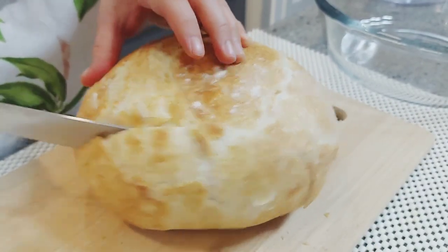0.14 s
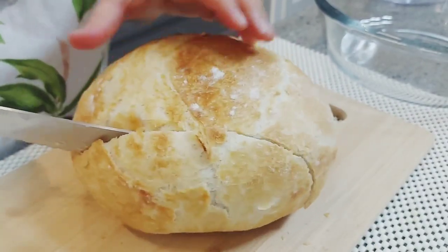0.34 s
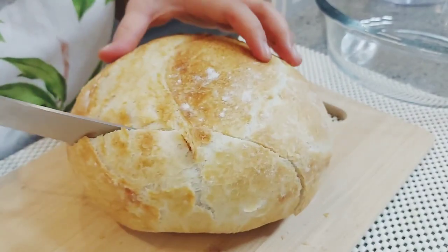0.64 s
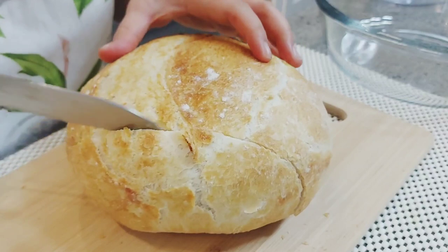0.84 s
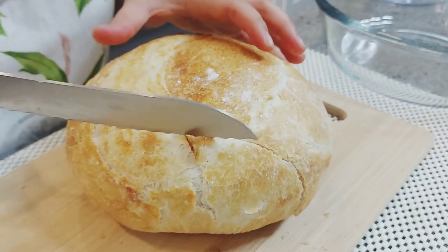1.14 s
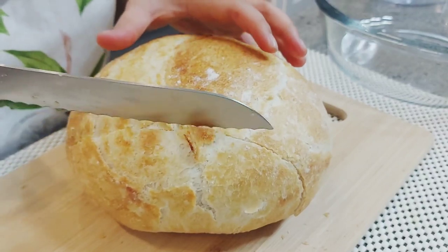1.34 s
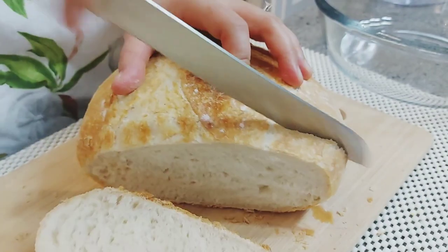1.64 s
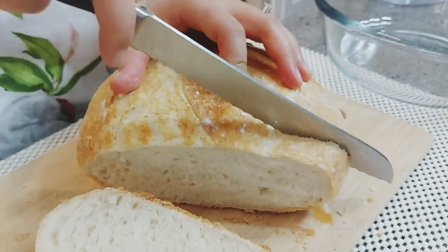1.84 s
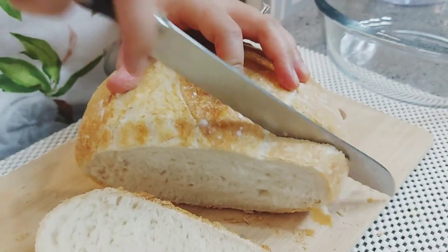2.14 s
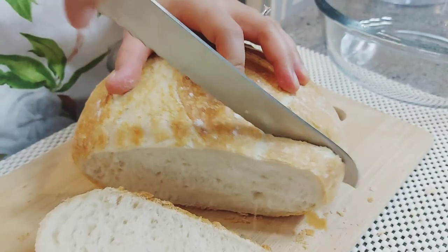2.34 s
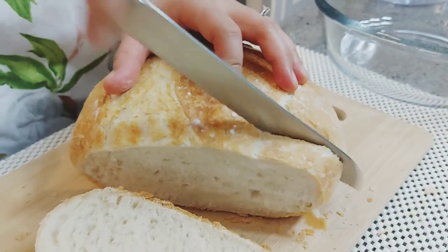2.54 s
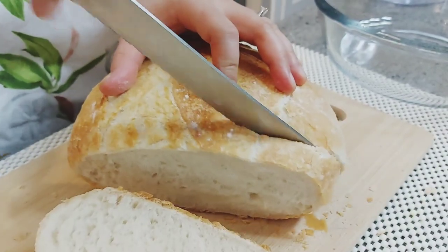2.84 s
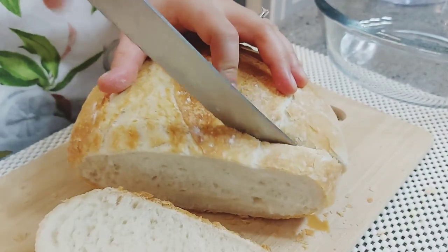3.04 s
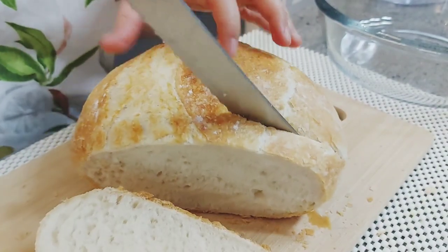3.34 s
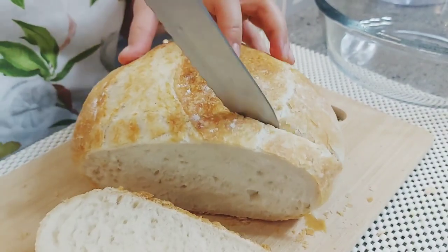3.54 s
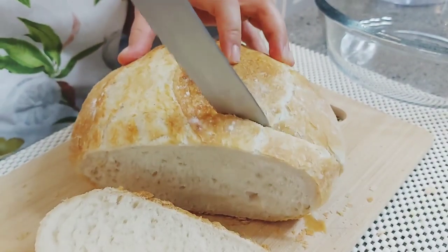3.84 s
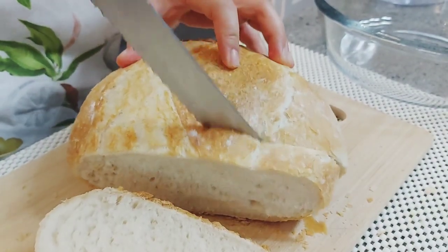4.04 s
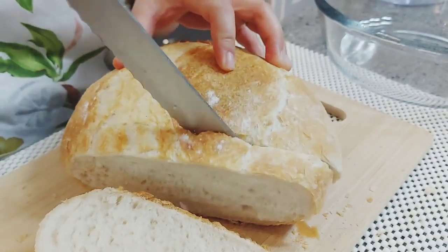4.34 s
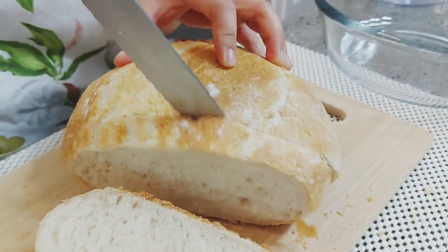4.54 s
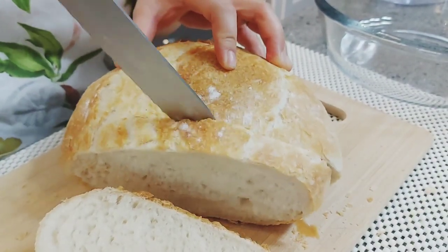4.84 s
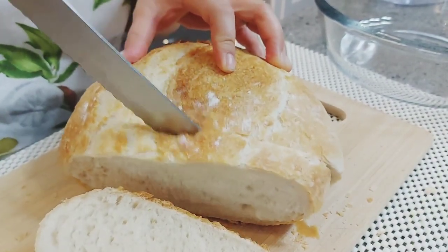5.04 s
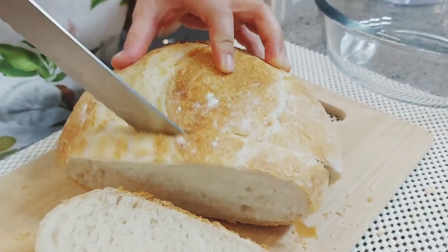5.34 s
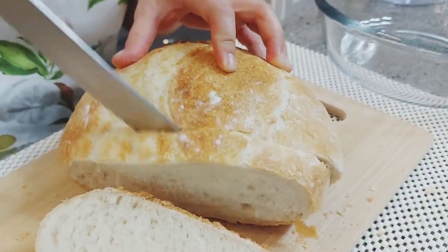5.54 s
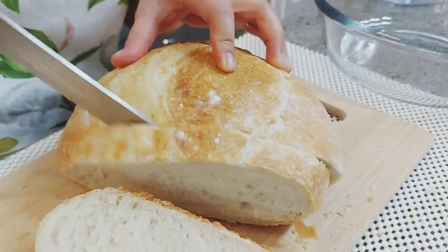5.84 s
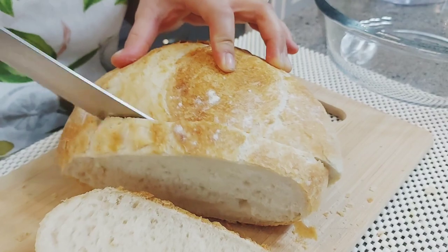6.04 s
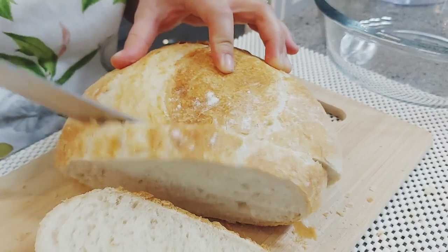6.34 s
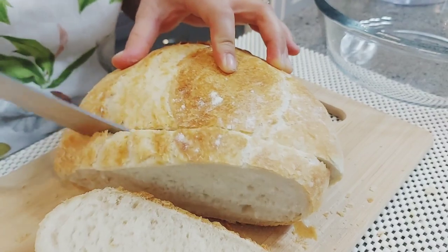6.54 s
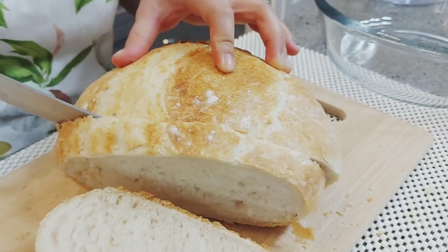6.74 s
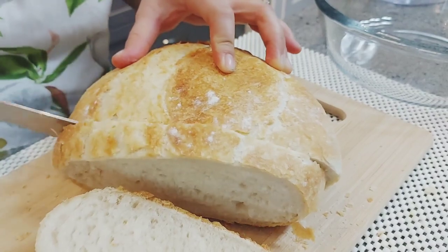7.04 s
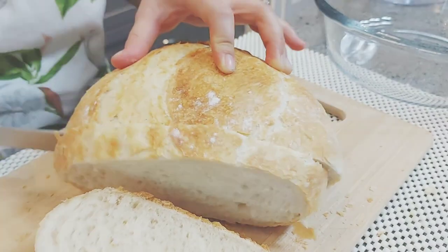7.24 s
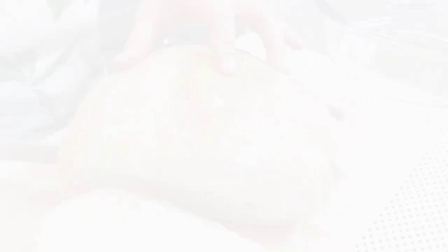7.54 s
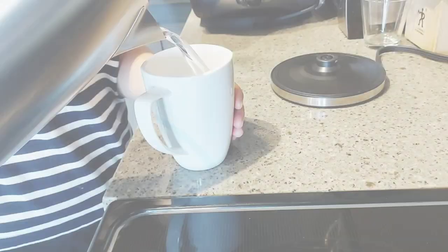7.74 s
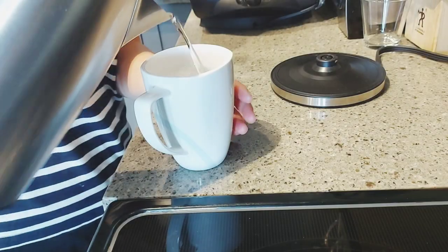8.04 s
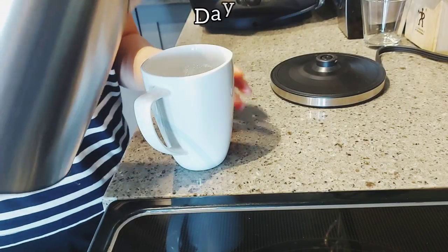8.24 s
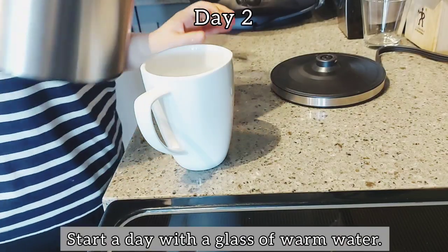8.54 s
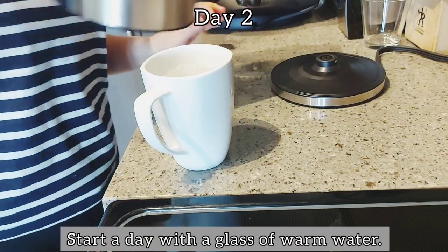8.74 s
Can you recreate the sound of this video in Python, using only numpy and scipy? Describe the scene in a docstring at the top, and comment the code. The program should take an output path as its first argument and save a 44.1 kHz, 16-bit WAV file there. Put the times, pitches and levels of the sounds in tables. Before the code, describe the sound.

Close stereo phone pickup in a small kitchen. A few light scrapes and ticks of a blade on crust, a near-quiet gap, then brisk sawing at about three strokes a second, crunchy and crackling, with one wooden tip knock. Strokes gradually soften and drift left, then fade quickly into a faintly humming kitchen with a few watery blips in a mug.

```python
"""A small kitchen, close up: a serrated knife saws a crusty loaf on a wooden board, heard in stereo by a phone.
Each stroke is noise shaped by a random stream of breaking crust cells, with short bursts for cracks, ticks
and soft taps of the blade; filters for loaf, crust, teeth and blade colour it, and reflections place it.
The sawing fades out quickly and a second, humming kitchen fades in, where the last splashes from a kettle
fall into a mug: gliding sine bubbles with noise spray, over a soft hiss."""
import sys
import numpy as np
from scipy import signal
from scipy.fft import rfft, irfft
from scipy.io import wavfile
from scipy.ndimage import uniform_filter1d

SR = 44100
rng = np.random.default_rng(int(sys.argv[2]) if len(sys.argv) > 2 else 0)


def unload_wav(signal):
    """Save mono or channel-first audio to the path in sys.argv[1] as 16-bit WAV at rate SR, clipped to [-1, 1]."""
    wavfile.write(
        sys.argv[1],
        SR,
        np.round(np.clip(np.atleast_2d(signal).T, -1, 1) * 32767).astype(np.int16),
    )


N = 391608
TIME = np.arange(N) / SR

# where the cut lies, and its brightness: (time [s], lead of the left microphone [samples],
# left minus right before weighting by layer [dB], blade sheen gain [dB], tooth rasp gain [dB])
CUT_PLACE = [(.6, 9.2, 6, -6, 1.5), (1.1, 7, 3.5, 3.5, -1.5), (1.5, 0.97, -0.5, -4.5, -3.5),
             (3.1, 3.91, 1, 0, 0.1), (4.7, 6.8, 2, 0.5, -2), (5.6, 8.86, 5, 3, -0.5),
             (7.2, 11.5, 6, 0, 0.2)]
# how deep the teeth dig in: (time [s], depth [0 = sliding over the crust, 1 = tearing through it])
CUT_DEPTH = [(.05, 0.52), (.2, 0.015), (.3, 0.48), (.6, 0.062), (.95, 1), (1.15, 0.61), (1.8, 0.61),
             (2.2, .5), (3.1, 0.72), (3.7, 0.62), (4.45, 0.79), (5.25, 0.65), (5.75, 0.67), (5.95, 0.84),
             (6.3, 0.75), (6.6, .48), (7.15, 0.31), (7.5, 0.42)]
# colour of water hiss and spray: (frequency [Hz], level [dB])
WATER_COLOUR = [(1000, -12), (2000, -17), (3200, -6.5), (5500, -7.5), (7000, 5.5), (9000, -11), (12000, 2),
                (16000, -5)]

# crossovers between loaf, crust, teeth and blade
LOAF_TOP_HZ, CRUST_TOP_HZ, TEETH_TOP_HZ = 500, 4000, 9500


def undb(db):
    """Decibels to gain."""
    return 10 ** (np.asarray(db) / 20)


def curve(rows, axis=1):
    """One column of a table, joined by straight lines in time."""
    rows = np.array(rows)
    return np.interp(TIME, rows[:, 0], rows[:, axis])


def unit(x):
    """Scale to an energy of one per channel."""
    energy = np.sum(x ** 2, axis=-1, keepdims=True)
    return x / np.sqrt(energy + 1e-20)


def add(out, s, x):
    """Mix a short sound in at time s."""
    i = int(s * SR)
    out[i:i + len(x)] += x[:N - i]


def convolve(x, impulse):
    """Pass a sound through an impulse response."""
    return signal.oaconvolve(x, impulse)[:len(x)]


def colour(points, hz):
    """Gain of a spectrum at the given frequencies, joined along log frequency."""
    f, db = np.transpose(points)
    return undb(np.interp(np.log(hz + 1), np.log(f), db))


def response(points, lo, hi, size=4096):
    """Minimum-phase impulse response of a spectrum between two soft edges: its energy comes at once."""
    hz = np.arange(size // 2 + 1) * SR / size + 1
    edges = np.sqrt((1 + (lo / hz) ** 10) * (1 + (hz / hi) ** 10))
    gain = colour(points, hz) / edges
    # folding the cepstrum forward in time makes the response causal
    cepstrum = irfft(np.log(gain + 1e-5))
    cepstrum[1:size // 2] *= 2
    cepstrum[size // 2 + 1:] = 0
    return unit(irfft(np.exp(rfft(cepstrum))))


def tail(t60, delay, share, size=22050):
    """Reflections that start after a delay and die away; a small share leaves them few and distinct."""
    t = TIME[:size]
    echoes = rng.standard_normal(size) * (rng.random(size) < share)
    return unit(echoes * undb(-60 * t / t60) * (t > delay))


def noise(points, db):
    """Steady noise with a given spectrum and RMS level."""
    hz = np.arange(N // 2 + 1) * SR / N
    x = irfft(rfft(rng.standard_normal(N)) * colour(points, hz), N)
    return unit(x) * np.sqrt(N) * undb(db)


def kitchen(x, pan_db, near_db, room_db, near_t60=.026, room_t60=0.34, count=4):
    """Two microphones hear the direct sound, single echoes off board and counter, and the room."""
    n, lead = np.arange(N), curve(CUT_PLACE) / 2
    # short stretches of sound take turns at random spots, each with its own nearby reflections
    spot = np.repeat(rng.integers(count, size=N // 256 + 1), 256)[:N]
    parts = [x * uniform_filter1d((spot == k) * 1., size=64) for k in range(count)]
    channels = []
    for side in (1, -1):  # left, right
        heard_at = n + np.round(side * lead).astype(int)
        direct = x[np.clip(heard_at, 0, N - 1)]
        near = sum(convolve(part, tail(near_t60, .0001, .1, size=2048)) for part in parts)
        room = convolve(x, tail(room_t60, 0.0095, 1))
        mix = direct + undb(near_db) * near + undb(room_db) * room
        channels.append(mix * undb(side * pan_db / 2))
    return np.array(channels) / np.sqrt(1 + undb(2 * near_db) + undb(2 * room_db))


def board_air():
    """Quiet room air and a slightly wavering low hum, riding one level curve."""
    # room air: (frequency [Hz], level [dB])
    air_colour = [(30, -16.5), (70, -7.5), (230, -1.5), (700, -14.5), (3000, -38), (6500, -26.5),
                  (16000, -32)]
    # gain of hum and air together: (time [s], level [dB])
    air_level = [(0, -57.5), (1.35, -86), (1.45, -55.5), (6.3, -54), (7.5, -67.5)]
    waver = np.interp(TIME, TIME[::4000], rng.standard_normal(len(TIME[::4000])))
    hum = np.sqrt(2) * np.sin(2 * np.pi * np.cumsum(220.7 + 1.5 * waver) / SR)
    shared_air = noise(air_colour, -5)
    wide_air = np.array([noise(air_colour, -8) for _ in range(2)])
    return (hum + shared_air + wide_air) * undb(curve(air_level))


def dig(s):
    """How much deeper than usual the blade sits at time s."""
    usual_depth = 0.59
    return np.interp(s, *np.transpose(CUT_DEPTH)) - usual_depth


def strokes():
    """Lone scrapes, and saw cycles of a push and a usually weaker pull: (start s, length s, dB, 1 if pulled)."""
    # the blade grazes the crust while lifted or lined up: (start [s], length [s], base level [dB])
    scrapes = [(0.017, 0.11, -39), (0.168, 0.079, -41.5), (0.255, 0.081, -42), (.384, 0.06, -64.5),
               (0.51, 0.14, -58.5), (0.646, 0.23, -66.5), (0.926, .1, -60), (1.135, 0.066, -50.5),
               (1.183, 0.077, -61), (1.337, 0.045, -64), (1.404, 0.041, -47), (3.434, 0.16, -54.5),
               (7.411, .1, -56)]
    # saw cycles: (start [s], length of the push [s], base push level [dB], base pull level [dB])
    saw_cycles = [(1.463, 0.11, -29.5, -30.5), (1.791, .106, -32, -33.5), (2.086, .118, -30, -37.5),
                  (2.416, 0.084, -31, -32.5), (2.72, 0.1, -36.5, -41), (3.03, 0.078, -35.5, -66),
                  (3.648, 0.1, -36, -37.5), (3.977, .098, -33.5, -40.5), (4.309, 0.072, -33, -39.5),
                  (4.629, 0.088, -33.5, -39), (4.944, 0.11, -38.5, -40.5), (5.266, 0.099, -36.5, -41),
                  (5.588, 0.15, -36, -41.5), (5.905, 0.1, -37, -38.5), (6.222, 0.11, -32.5, -45.5),
                  (6.544, 0.11, -39.5, -47), (6.854, 0.12, -38.5, -44.5), (7.14, .098, -42.5, -56)]
    # a firm pull runs its full length, a light one stops sooner: (pull level [dB], share of full length)
    pull_reach = [(-44, .75), (-40, 1)]
    # the hand turns round partway to the next push; both are shares of one cycle
    pull_starts, pull_lasts, slowest_cycle_s = .49, .345, .33
    moves = [(start, length, db, 0) for start, length, db in scrapes]
    gaps = np.diff([row[0] for row in saw_cycles])
    cycles = np.minimum(np.append(gaps, gaps[-1]), slowest_cycle_s)
    for (start, length, push_db, pull_db), cycle in zip(saw_cycles, cycles):
        reach = np.interp(pull_db, *np.transpose(pull_reach))
        moves.append((start, length, push_db, 0))
        moves.append((start + pull_starts * cycle, reach * pull_lasts * cycle, pull_db, 1))
    return moves


def pressure(gain_db, deep_db, pull_db, rise_s, fall_s, arch_db):
    """Each stroke sets in fast, peaks midway and dies as the knife turns; depth and direction shift it."""
    power, pull_shift = np.zeros(N), np.broadcast_to(pull_db, N)
    for start, length, db, pulled in strokes():
        span = slice(max(0, int((start - .05) * SR)), int((start + length + .2) * SR))
        t = TIME[span] - start
        arch = arch_db * (np.sin(np.pi * np.clip(t / length, 0, 1)) - 1)
        edges = np.exp(np.minimum(t, 0) / rise_s - np.maximum(t - length, 0) / fall_s)
        level = db + gain_db + deep_db * dig(start + length / 2) + pulled * pull_shift[span]
        power[span] += (undb(level + arch) * edges) ** 2
    return np.sqrt(power)


def fractures(burst_s, tooth_hz, bite_db, slide_rub):
    """Cells break at random, mostly small, loudest as each tooth bites; a sliding blade mostly rubs."""
    per_s, spread_db, deep_rub = 650, 5.5, .06
    breaks = rng.random(N) < per_s / SR
    sizes = undb(spread_db * np.minimum(rng.exponential(size=N), 4)) * breaks
    power = convolve(sizes ** 2, np.exp(-TIME[:1000] / burst_s))
    speed = np.interp(TIME, TIME[::1000], np.exp(0.25 * rng.standard_normal(len(TIME[::1000]))))
    tooth = np.cumsum(tooth_hz * speed / SR) % 1  # 0 at the bite, towards 1 before the next
    depth = np.clip(curve(CUT_DEPTH), 0, 1)
    rub = deep_rub + slide_rub * (1 - depth) ** 3
    return np.sqrt(np.abs(power) / power.mean() + rub) * undb(-bite_db * depth * tooth)


def sawing(grain, body, even_s):
    """The stream of fractures rings a body; its strength stays even over a few teeth."""
    x = convolve(grain * rng.standard_normal(N), body)
    return x / np.sqrt(uniform_filter1d(x ** 2, int(even_s * SR)) + 1e-9)


def hollow(x, turn_hz, tilt_db):
    """The deeper the cut, the more the crumb muffles the crackle and the lower the crust sounds."""
    low = signal.sosfiltfilt(signal.butter(2, turn_hz, fs=SR, output="sos"), x)
    gain = undb(tilt_db * (curve(CUT_DEPTH) - 0.6576))
    return low * gain + (x - low) / gain


def cracks_and_ticks(count=2):
    """Placed contacts, and random ones whose level follows their stroke: (s, crack dB, tick dB)."""
    # cracks, ticks and soft taps of the blade on the crust:
    # (time [s], base crust crack level [dB], base tooth tick level [dB])
    contacts = [(.0363, -39.5, -26.5), (.0692, -30.5, -28), (.989, -46.5, -56), (1.01, -48, -50),
                (1.129, -41.5, -39.5), (1.346, -53.5, -37), (1.4869, -20, -28.5), (1.5062, -17.5, -31),
                (1.5401, -18, -16.5), (1.5634, -21, -17), (1.8108, -13.5, -17.5), (1.8467, -15, -16),
                (1.8751, -14.5, -26), (2.1117, -19, -35.5), (2.1525, -21, -21.5), (2.1918, -27, -18.5),
                (2.2921, -31, -20.5), (2.4104, -28.5, -24), (2.4751, -15, -20.5), (2.746, -31, -19.5),
                (2.7642, -25, -16), (3.0353, -32.5, -27), (3.0814, -19, -25), (3.65, -35, -33),
                (3.6782, -25, -25), (4.1127, -32, -34.5), (4.6455, -29, -26.5), (4.669, -27.5, -22.5),
                (4.6973, -17.5, -19), (5.0079, -27, -28), (5.1249, -55, -32), (5.3326, -15, -38),
                (5.343, -24, -27), (5.445, -33, -25.5), (5.618, -32, -28), (5.6846, -33.5, -22.5),
                (5.9161, -37, -33.5), (5.9936, -24, -20), (6.0361, -44, -27), (6.1314, -27, -35),
                (6.2031, -35.5, -25.5), (6.2152, -39, -27.5), (6.2709, -40, -42.5), (6.7227, -43, -33),
                (6.844, -37, -33), (7.186, -43, -30.5)]
    over_stroke_db, scatter_db = 3.5, 3.5
    rows = list(contacts)
    for start, length, db, _ in strokes():
        for place in rng.triangular(0, .5, 1, count):
            crack, tick = db + over_stroke_db + scatter_db * rng.standard_normal(2)
            rows.append((start + place * length, crack, tick))
    return rows


def snapping(body, times, levels_db, crack_s, splinter):
    """Each contact rings a body with one short impulse, then a few milliseconds of splintering noise."""
    level_window_s = .005  # levels are RMS over this time
    out, t = np.zeros(N), TIME[:len(body)]
    shape = np.exp(-t / crack_s) + splinter * np.exp(-t / .0035)
    crack = np.roll(body, int(crack_s * SR / 2))
    for s, db in zip(times, levels_db):
        splinters = unit(convolve(shape * rng.standard_normal(len(t)), body))
        snap = unit(np.sqrt(2) * crack + splinters)
        add(out, s, snap * undb(db) * np.sqrt(level_window_s * SR))
    return out


def knocks():
    """The tip comes through the loaf and rings the wooden board as decaying sine modes."""
    # blade tip on the board: (time [s], level [dB])
    tip_hits = [(2.4745, -18.5), (2.483, -24.5)]
    # modes of the board: (frequency [Hz], relative level [dB], t60 [s])
    board_modes = [(690, -1.5, 0.042), (770, 8, 0.043), (828, 0, .05), (1340, -13, .04)]
    out, t = np.zeros(N), TIME[:4096]
    ring = sum(undb(db - 60 * t / t60) * np.sin(2 * np.pi * hz * t) for hz, db, t60 in board_modes)
    for s, db in tip_hits:
        add(out, s, undb(db) * ring)
    return out


def bread():
    """The same fractures thump the loaf, crackle in the crust, tick on the teeth and glint in the steel."""
    # colour of loaf and board: (frequency [Hz], level [dB])
    loaf_colour = [(25, -42), (50, -10), (88, -9.5), (122, 2), (160, -4.5), (220, -0.5), (260, -5),
                   (305, 2), (400, -3.5), (600, -7)]
    # colour of the crust: (frequency [Hz], level [dB])
    crust_colour = [(400, -9.5), (600, -4), (760, -2.5), (1000, -4), (1400, -6.5), (2000, -9), (2600, -8.5),
                    (3400, -13.5), (5000, -12)]
    # colour of the teeth: (frequency [Hz], level [dB])
    teeth_colour = [(3500, -5.5), (5200, -5.5), (7100, -3), (8200, -7.5), (9100, -15.5), (11000, -4)]
    # the steel blade's bright top: (frequency [Hz], level [dB])
    blade_colour = [(9000, -9.5), (10500, -1.5), (10950, -5), (11500, 2), (12100, -7.5), (13400, 6),
                    (14100, -5), (14500, -4.5), (15050, 1.5), (15650, -3), (16300, -19.5)]
    # the teeth catch in the crumb and thump the loaf: (time [s], level [dB])
    catches = [(2.6512, -26), (3.7062, -21.5), (4.004, -30), (4.6457, -21), (4.664, -18.5), (5.7621, -31),
               (5.9158, -29), (7.227, -39)]
    # shift of the treble in the pulls: (time [s], level [dB])
    pull_treble = [(2, -5), (2.3, 1.5), (2.6, -6), (2.95, 0), (4.5, -4.5), (4.85, -1.5), (6.4, -1),
                   (7.05, -13)]

    times, crack_db, tick_db = np.transpose(cracks_and_ticks())
    # each contact also jolts the loaf: 5.5 dB under the mean of its crack and tick, more in a deep cut
    jolt_db = (crack_db + tick_db) / 2 - 5.5 + 20.5 * dig(times)
    # bite_db: how far the crackle sinks between one tooth's bite and the next at full depth
    grain = fractures(burst_s=0.00025, tooth_hz=55.4, bite_db=5, slide_rub=6.4)
    loaf = response(loaf_colour, 38, LOAF_TOP_HZ)
    crust = response(crust_colour, LOAF_TOP_HZ, CRUST_TOP_HZ)
    teeth = response(teeth_colour, CRUST_TOP_HZ, TEETH_TOP_HZ)
    blade = response(blade_colour, TEETH_TOP_HZ, SR)

    weight = pressure(gain_db=4.5, deep_db=11.5, pull_db=-0.5, rise_s=0.007, fall_s=0.044, arch_db=11.0)
    thump = sawing(grain, loaf, 0.076) * weight
    thump += snapping(loaf, times, jolt_db, crack_s=0.00091, splinter=0.19)
    thump += snapping(loaf, *np.transpose(catches), crack_s=.001, splinter=.3)

    crush = pressure(gain_db=4.5, deep_db=-6.5, pull_db=-2.35, rise_s=0.0074, fall_s=0.011, arch_db=9)
    crunch = sawing(grain, crust, 0.03) * crush
    crunch = hollow(crunch, turn_hz=1140, tilt_db=10.5) + knocks()
    crunch += snapping(crust, times, crack_db, crack_s=.0005, splinter=.25)

    bite = pressure(gain_db=3.0, deep_db=-6.5, pull_db=curve(pull_treble),
                    rise_s=0.0031, fall_s=0.0056, arch_db=8.0)
    # teeth and blade share each tick
    rasp = sawing(grain, teeth, 0.045) * bite
    rasp += snapping(teeth, times, tick_db, crack_s=.0003, splinter=.2) / np.sqrt(2)
    sheen = sawing(grain, blade, 0.074) * bite
    sheen += snapping(blade, times, tick_db, crack_s=.0003, splinter=.25) / np.sqrt(2)
    sheen *= undb(curve(CUT_PLACE, axis=3))
    rasp *= undb(curve(CUT_PLACE, axis=4))

    pan_db = curve(CUT_PLACE, axis=2)  # the phone's body shades mostly the short waves
    return (kitchen(thump, -.4, near_db=-14.5, room_db=-14)
            + kitchen(crunch, 0.19 * pan_db, near_db=-0.5, room_db=-7)
            + kitchen(rasp, .3 * pan_db, near_db=0, room_db=-10, near_t60=.014)
            + kitchen(sheen, 1.6 * pan_db, near_db=0, room_db=-13, near_t60=.018))


def kettle_air():
    """Noise for air, steady sines for appliance hum, and the soft hiss of pouring in the second kitchen."""
    # room air by the kettle: (frequency [Hz], level [dB])
    air_colour = [(25, -31.5), (55, -4.5), (100, -13), (180, -8.5), (220, -20.5), (300, -11.5), (410, -10),
                  (600, -22), (780, -23), (1050, -32.5), (1600, -40), (3000, -45), (16000, -41.5)]
    # appliance hum: (frequency [Hz], level [dB])
    hum_tones = [(59.2, -61.5), (96.9, -66), (414.5, -71)]
    # fade-in of hum and air: (time [s], level [dB])
    fade_in = [(7.6, -29), (7.7, -15.5), (8.1, -0.5), (8.4, -0.5), (8.65, 1)]
    # hiss of the trickle and of the kettle being lifted away: (time [s], level [dB])
    trickle = [(7.7, -90), (8, -78), (8.2, -65.5), (8.34, -65.5), (8.48, -84), (8.56, -62), (8.88, -80.5)]
    hum = 0
    for hz, db in hum_tones:
        tone = np.sin(2 * np.pi * (hz * TIME + rng.random()))
        hum = hum + np.sqrt(2) * undb(db - 0.5) * tone
    shared_air = noise(air_colour, -62.5)
    wide_air = np.array([noise(air_colour, -60) for _ in range(2)])
    hiss = np.array([noise(WATER_COLOUR, 0) for _ in range(2)]) * undb(curve(trickle))
    return (hum + shared_air + wide_air) * undb(curve(fade_in)) + hiss


def drops(glide=0.35, scatter=0.06, apart_s=0.0044, t60=0.068, count=7):
    """Each splash throws a little spray and traps ever quieter bubbles whose pitch rises as they ring out."""
    # splashes into the mug: (time [s], central bubble pitch [Hz], base level [dB])
    splashes = [(7.869, 2060, -67.5), (7.92, 2020, -69), (8.012, 4440, -63), (7.972, 1950, -52.5),
                (7.98, 2510, -59), (8.017, 1187, -59), (8.053, 2490, -58.5), (8.176, 1650, -46),
                (8.187, 1620, -51), (8.18, 2310, -52), (8.23, 2440, -55)]
    spray_db, spray_t60_s = -10.5, .09  # spray level is relative to its splash
    out, t = np.zeros(N), TIME[:4096]
    droplet = response(WATER_COLOUR, 3500, SR)
    for s, hz, db in splashes:
        spray = convolve(rng.standard_normal(len(t)), droplet)
        add(out, s, spray * undb(db + spray_db - 60 * t / spray_t60_s))
        for k, (detune, late) in enumerate(rng.standard_normal((count, 2))):
            pitch = hz * (1 + scatter * detune) * (1 + glide * t)
            envelope = undb(db - 1.76 * k - 60 * t / t60) * (1 - np.exp(-t / 0.0006))
            bubble = envelope * np.sin(2 * np.pi * pitch * t)
            add(out, s + apart_s * k * (1 + 0.09 * late), bubble)
    return kitchen(out, -1.4, near_db=10, room_db=4.5)


def scene():
    """The bread fades to silence, then the kettle's kitchen takes over."""
    cut_s = 7.6
    fade_out = np.clip((cut_s - TIME) / 0.045, 0, 1) ** 2
    sawn_loaf = (board_air() + bread()) * fade_out
    return sawn_loaf + (kettle_air() + drops()) * (TIME > cut_s)


def record(dry):
    """The phone rounds the highest peaks by soft saturation and cuts the top with a steep low-pass."""
    top_hz = 16100
    low_pass = signal.ellip(10, .2, 70, top_hz, fs=SR, output="sos")
    return signal.sosfilt(low_pass, np.tanh(dry))


dry = scene()
out = record(dry)
unload_wav(out)
```